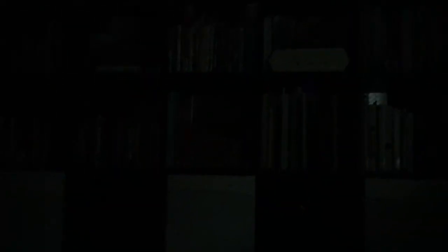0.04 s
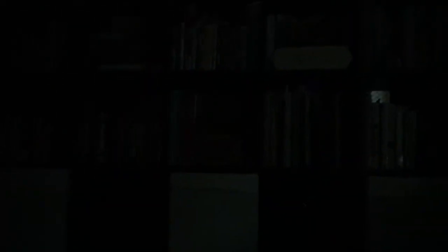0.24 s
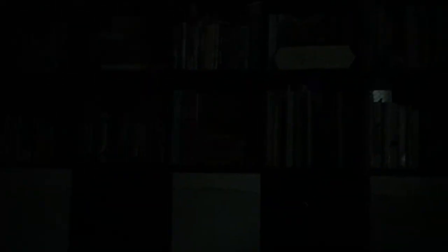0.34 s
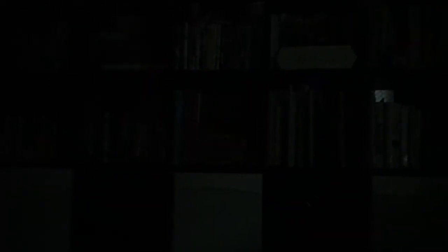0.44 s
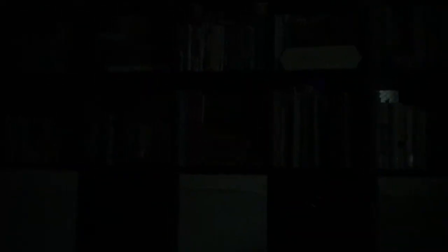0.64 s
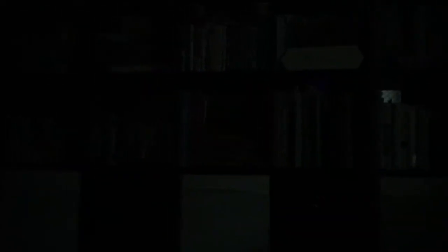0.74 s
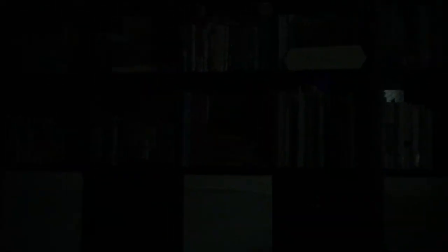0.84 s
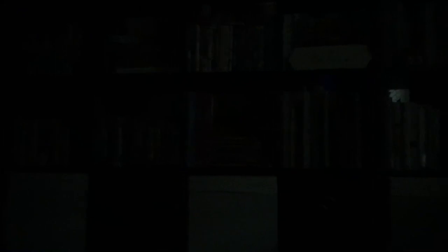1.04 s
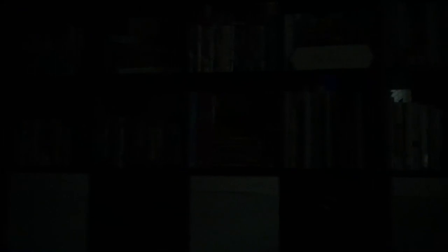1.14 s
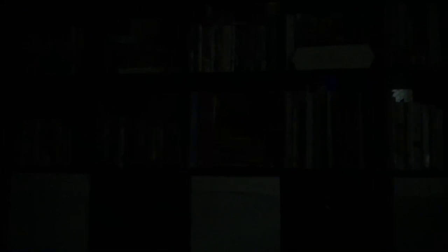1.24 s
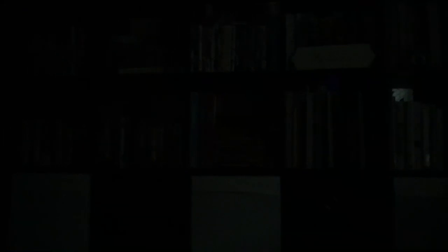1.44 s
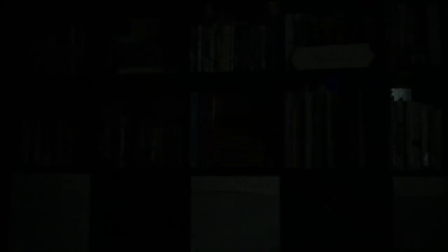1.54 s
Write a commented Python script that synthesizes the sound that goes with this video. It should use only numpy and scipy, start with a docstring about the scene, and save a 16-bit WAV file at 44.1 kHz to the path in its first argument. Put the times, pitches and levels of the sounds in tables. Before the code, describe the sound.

A gecko calls once in a quiet room. At about 0.2 seconds it gives a short, sharp bark that turns raspy as its pitch drops. From about 0.5 to 0.9 seconds comes a lower croak, its pulses slowing to a rattle and fading. The room reverberates briefly after each. Something ticks softly at 1.3 seconds. A faint electrical hum, low rumble and hiss continue throughout.

```python
"""Hum lines, low rumble and a faint hiss fill a quiet furnished room. A tokay gecko calls once, its vocal cords
exciting the resonances of throat and mouth: first a short pitched bark that breaks up as it drops, then a long
croak whose pulses slow to a rattle and fade. The room reverberates after each. Last, something ticks softly."""
import sys
import numpy as np
from scipy import signal
from scipy.fft import rfft, irfft
from scipy.io import wavfile

SR = 44100
rng = np.random.default_rng(int(sys.argv[2]) if len(sys.argv) > 2 else 0)


def bounce(signal):
    """Save signal as a 16-bit WAV file at the path given by the first command-line argument."""
    frames = np.transpose(np.atleast_2d(signal))
    limited = np.clip(frames, -1, 1)
    pcm = np.round(limited * 32767).astype(np.int16)
    wavfile.write(sys.argv[1], SR, pcm)


N = 70560
T = np.arange(N) / SR
BIN_HZ = np.arange(N // 2 + 1) * SR / N
LONG_RING_S = .42  # t60 of the room's longest-ringing mode


def from_db(db):
    """Amplitude ratio of a level in decibels."""
    return 10 ** (np.asarray(db) / 20)


def rms_one(x):
    """Normalisation to unit mean power."""
    return x / np.sqrt(np.mean(x ** 2) + 1e-20)


def curve(rows, column=1):
    """Linear interpolation of one table column in time."""
    rows = np.array(rows)
    return np.interp(T, rows[:, 0], rows[:, column])


def envelope(rows):
    """Amplitude envelope from a table's last column; zero outside its time span."""
    return from_db(curve(rows, column=-1)) * (T >= rows[0][0]) * (T <= rows[-1][0])


def at_hz(points, hz):
    """Interpolation on a logarithmic frequency axis."""
    f, value = np.transpose(points)
    return np.interp(np.log(hz + 1e-9), np.log(f), value)


def noise(spectrum):
    """Spectral shaping of white noise, at unit power."""
    return rms_one(irfft(rfft(rng.standard_normal(N)) * from_db(at_hz(spectrum, BIN_HZ)), N))


def drift(corner_hz):
    """Random fluctuation: low-passed noise of unit power."""
    return rms_one(irfft(rfft(rng.standard_normal(N)) / (1 + (BIN_HZ / corner_hz) ** 2), N))


def sine(phase):
    """Sinusoid of unit power with a random starting phase."""
    return np.sqrt(2) * np.sin(phase + rng.uniform(0, 2 * np.pi))


def band(x, low, high):
    """Band-pass filtering between two edges in Hz."""
    edges = np.clip([low, high], 10, SR / 2 - 100)
    return signal.sosfilt(signal.butter(2, edges, "band", fs=SR, output="sos"), x + 1e-18)


def background():
    """Noise floor: wavering hum tones over steady rumble; hiss and a narrow-band whine swell a little."""
    # hum lines: (frequency [Hz], rms level [dB])
    hum_tones = [(59.8, -60.5), (119.6, -65.5), (173, -73.5)]
    # still air: (frequency [Hz], relative spectral density [dB])
    air_spectrum = [(20, -8), (32, -16), (45, 0.5), (75, -1.5), (130, -0.5), (220, -10), (400, -19.5),
                    (800, -22.5), (1250, -24), (1650, -23.5), (2400, -28), (5000, -31.5), (7500, -30),
                    (10500, -37), (13000, -32.5), (15500, -38.5)]
    # swell of hiss and whine: (time [s], gain [dB])
    swell = [(0, -3), (.2, 0), (1.0, -.5), (1.5, 1.5), (1.6, -0.5)]
    hum = sum(from_db(db + 2 * drift(corner_hz=5)) * sine(2 * np.pi * hz * T) for hz, db in hum_tones)
    whine = from_db(-86) * rms_one(band(rng.standard_normal(N), 1571, 1609))
    air = from_db(-64.5) * noise(air_spectrum)
    rumble = signal.sosfiltfilt(signal.butter(2, 308, fs=SR, output="sos"), air)
    hiss = air - rumble
    return hum + rumble + from_db(curve(swell)) * (hiss + whine)


def vocal_cords(rate, start, jitter, shimmer_db, rough, puff_s):
    """Glottal source: snaps that grow more uneven as they slow, each followed by a puff of air."""
    clicks, at = np.zeros(N), start * SR
    first_period = SR / rate[int(at)]
    for late, strong in rng.standard_normal((N // 40, 2)):
        if at >= N:
            break
        period = SR / rate[int(at)]
        clicks[int(at)] = np.sqrt(period) * from_db(shimmer_db * strong)  # about unit power at any rate
        at += period * np.exp(jitter * period / first_period * late)
    decay = np.exp(-1 / (puff_s * SR))
    puff_power = signal.lfilter([1 - decay], [1, -decay], clicks ** 2 + 1e-18)
    puffs = np.sqrt(puff_power) * rng.standard_normal(N)
    return np.sqrt(1 - rough) * clicks + np.sqrt(rough) * puffs


def mouth(source, formants, start, end):
    """Formant filtering: resonances swell or fade as the mouth moves, at an even total power."""
    age = np.clip(T, start, end) - start
    voice, power = 0, 0
    for hz, width, db, db_per_s in formants:
        gain = from_db(db + db_per_s * age)
        voice += gain * band(source, hz - width / 2, hz + width / 2)
        power += gain ** 2 * 2 * width / SR
    return voice / np.sqrt(power)


def bark():
    """A harmonic series on a falling fundamental, outlasted by a rasp of irregular glottal pulses."""
    # fundamental: (time [s], frequency [Hz])
    fundamental = [(.23, 499.2), (.245, 493.3), (.259, 493), (.269, 468.6), (.279, 447.4), (.289, 337.5),
                   (.316, 314.7)]
    # clear voice: (time [s], level [dB])
    clear_level = [(.229, -57), (.236, -39.5), (.249, -33), (.266, -29), (.278, -29), (.287, -45),
                   (.30, -71)]
    # its harmonics, lowest first: (relative level at 0.26 s [dB], change as the mouth opens [dB/s])
    harmonics = [(-49.5, -100), (-4, -250), (0.5, 15.5), (-7.5, 358), (-21.5, 96), (-41, -2.5), (-21, -100),
                 (-25.5, -5), (-17, 129.5)]
    # rasp: (time [s], level [dB])
    rasp_level = [(0.2303, -28.5), (.235, -37), (.245, -34), (.265, -31), (0.278, -38.5), (0.293, -36.5),
                  (.310, -39.5), (0.32, -56)]
    # throat and mouth: (frequency [Hz], bandwidth [Hz], relative gain [dB], change [dB/s])
    formants = [(702, 292, 0, 45), (934, 170, 1, 32), (1402, 260, 9.5, 4), (1694, 190, 10.5, 12.5),
                (2680, 340, -4.5, -20), (3290, 620, 1.5, -170), (3878, 130, 5.5, -22), (4382, 88, 2, 13),
                (6050, 1800, -17, -54), (7900, 2100, -28, -69.5), (12700, 1200, -26.5, -120)]
    pitch, start, end = curve(fundamental), rasp_level[0][0], rasp_level[-1][0]
    phase = 2 * np.pi * np.cumsum(pitch * (1 + 0.01 * drift(corner_hz=146.3))) / SR
    opening_s = np.clip(T, start, .272) - .26
    clear = sum(from_db(db + db_per_s * opening_s) * sine(k * phase)
                for k, (db, db_per_s) in enumerate(harmonics, 1))
    clear *= envelope(clear_level)
    pulses = vocal_cords(pitch, start, jitter=.05, shimmer_db=1, rough=.25, puff_s=.0004)
    rasp = mouth(pulses * envelope(rasp_level), formants, start, end)
    return room(clear, wet_db=-3, modes_db=-1) + room(rasp, wet_db=0, modes_db=8.5)


def resonate(x, hz, t60):
    """Forced response of a narrow resonance with unit gain at its peak."""
    r, w = np.exp(-np.log(1000) / (t60 * SR)), 2 * np.pi * hz / SR
    feedforward = np.array([1, 0, -1]) * (1 - r * r) / 2
    return signal.lfilter(feedforward, [1, -2 * r * np.cos(w), r * r], x + 1e-18)


def room(x, wet_db, modes_db):
    """Reverberation: direct sound, a diffuse tail that dies sooner in the treble, and normal modes."""
    # reverberation time: (frequency [Hz], t60 [s])
    decay_times = [(300, 1), (1000, 0.28), (2000, .43), (4000, 0.33), (8000, 0.259), (14000, .22)]
    # normal modes of the room: (frequency [Hz], t60 [s], relative gain [dB])
    modes = [(638.3, LONG_RING_S, 8.5), (663, 0.17, 0.5), (777.7, .35, 5.5), (926, .3, -10), (989.4, .3, 3),
             (1113, 0.12, -2), (1359, 0.33, 1.5), (1416, 0.28, -6.5), (1494, .3, -2), (1699, 0.38, 0.5),
             (1783, .25, 0), (2428, .2, 7.5), (3238, .2, -0.5), (3940, 0.13, -1.5)]
    delay_s, build_s = .003, .0013
    age = np.maximum(T - delay_s, 0)
    build_up = 1 - np.exp(-age / build_s)
    edges, tail = np.geomspace(150, 18000, 11), 0
    for low, high in zip(edges, edges[1:]):
        fade = np.exp(-np.log(1000) * age / at_hz(decay_times, np.sqrt(low * high)))
        reflections = rms_one(band(rng.standard_normal(N), low, high) * fade * build_up)
        tail += reflections * np.sqrt(2 * (high - low) / SR / N)  # energy in proportion to bandwidth
    diffuse = from_db(wet_db) * signal.fftconvolve(x, tail)[:N]
    ringing = sum(from_db(db + modes_db) * resonate(x, hz, t60) for hz, t60, db in modes)
    return (x + diffuse + ringing) / np.sqrt(1 + from_db(2 * wet_db))


def croak():
    """Source and filter: rough pulses excite the formants and slow to a rattle as the air runs out."""
    # glottal pulse train: (time [s], pulse rate [1/s], level [dB])
    train = [(.4625, 378, -26.5), (.468, 366, -36.5), (.49, 320, -35.5), (.53, 231, -38.5),
             (.58, 168.6, -39.5), (.62, 102.6, -45.5), (.66, 63.5, -44), (.71, 52, -49), (.78, 56, -50.5),
             (.85, 59.5, -56), (.868, 55, -71.5)]
    # throat and mouth: (frequency [Hz], bandwidth [Hz], relative gain [dB], change [dB/s])
    formants = [(268, 200, -15.5, -31), (524, 43, -6, 12), (650, 56, 0, 3.5), (791, 79, 1, -11),
                (1046, 176, 1, -22.5), (1404, 204, -2, 1), (1690, 185, 2, 12.5), (2490, 300, -10, -11),
                (3199, 150, 0.5, -34), (3421, 284, -1.5, -3), (4066, 200, -25, -8), (5750, 530, -32.5, -21),
                (7950, 720, -37.5, -29), (12900, 2300, -44, -43.5)]
    start, end = train[0][0], train[-1][0]
    pulses = vocal_cords(curve(train), start, jitter=.04, shimmer_db=2.5, rough=.28, puff_s=.002)
    voice = mouth(pulses * envelope(train), formants, start, end)
    return room(voice, wet_db=1.5, modes_db=5.5)


def ring(x, hz, t60):
    """Damped oscillator: a unit impulse starts a decaying sine of amplitude one."""
    r, w = np.exp(-np.log(1000) / (t60 * SR)), 2 * np.pi * hz / SR
    return signal.lfilter([0, np.sin(w)], [1, -2 * r * np.cos(w), r * r], x + 1e-18)


def tick(time_s=1.2985, impulse_db=-53.5):
    """Free vibration: one small knock excites four quickly damped modes."""
    # modes of the knocked object: (frequency [Hz], gain [dB], t60 [s])
    modes = [(280, -2.5, 0.051), (473, 7, 0.0084), (615, -8, 0.084), (1990, -2.5, 0.015)]
    impulse = np.zeros(N)
    impulse[int(time_s * SR)] = from_db(impulse_db)
    return sum(from_db(db) * ring(impulse, hz, t60) for hz, db, t60 in modes)


def scene():
    """Superposition of the call, the tick and the noise floor in one channel."""
    return (bark() + croak() + tick() + background())[None]


def record(dry, cutoff_hz=15719):
    """Band limiting: a steep elliptic low-pass removes the highest treble."""
    return signal.sosfilt(signal.ellip(10, .1, 70, cutoff_hz, fs=SR, output="sos"), dry)


dry = scene()
out = record(dry)
bounce(out)
```